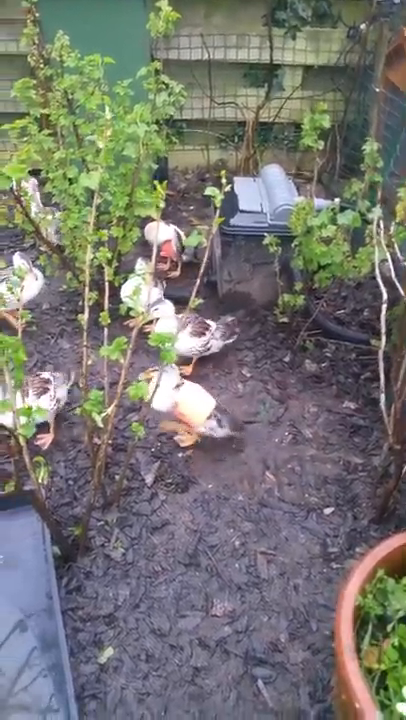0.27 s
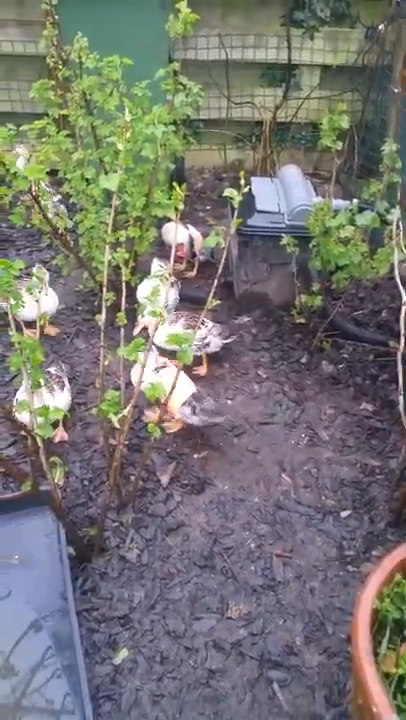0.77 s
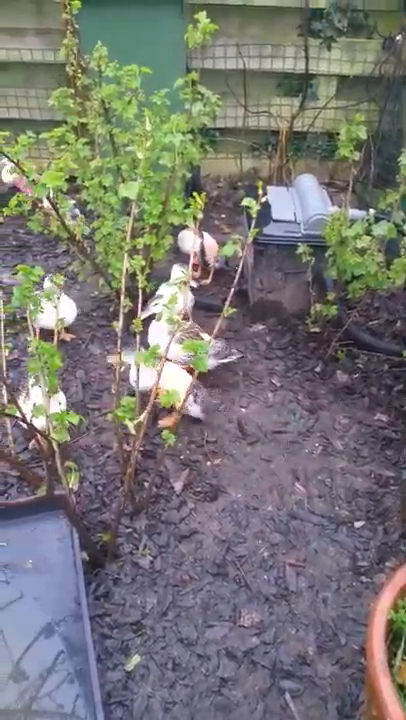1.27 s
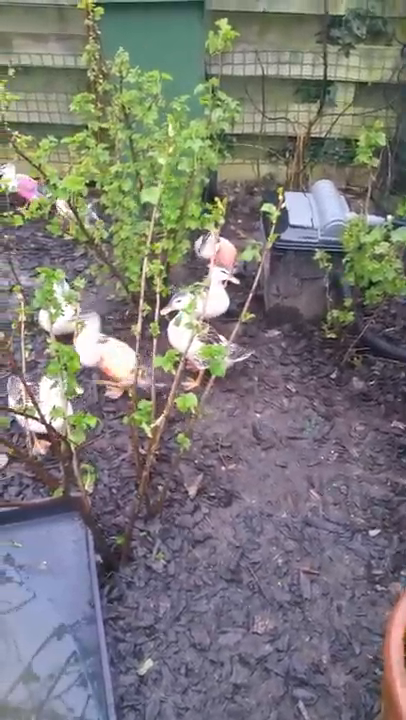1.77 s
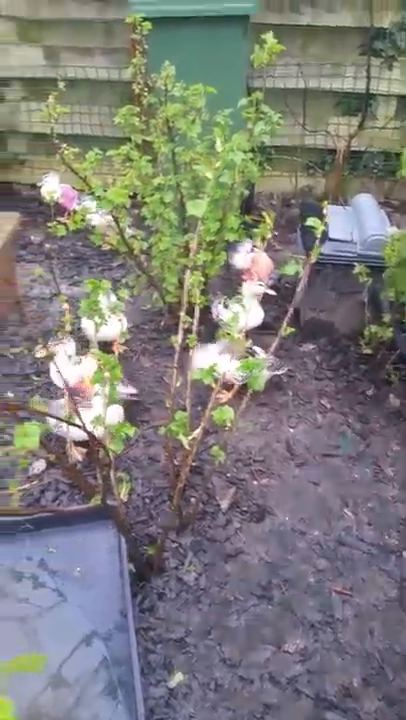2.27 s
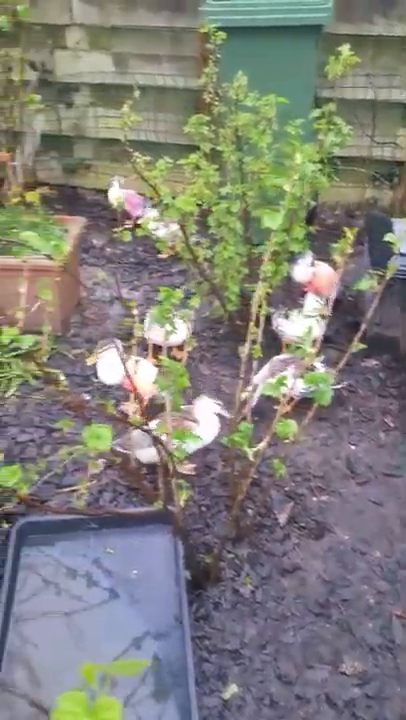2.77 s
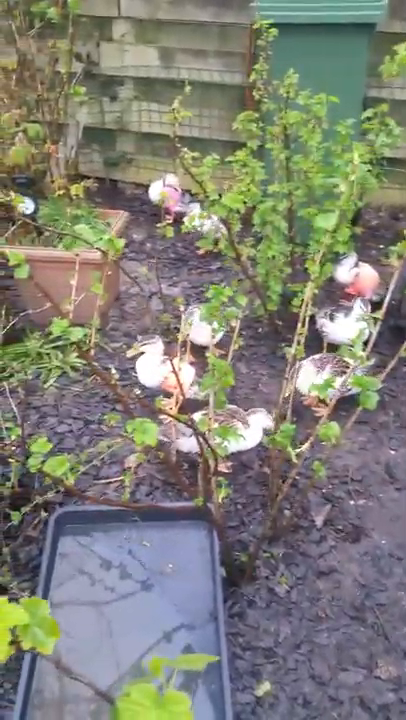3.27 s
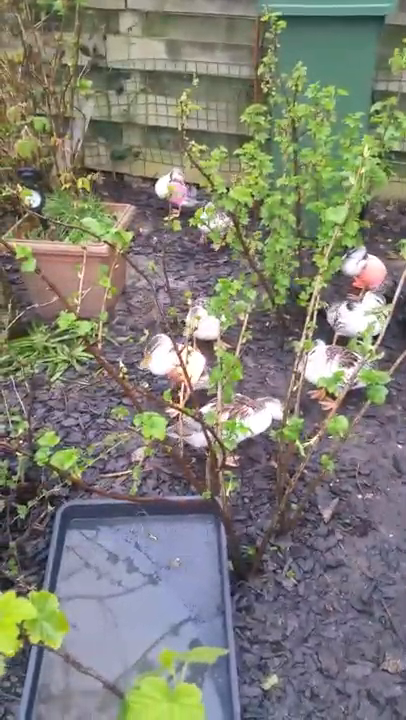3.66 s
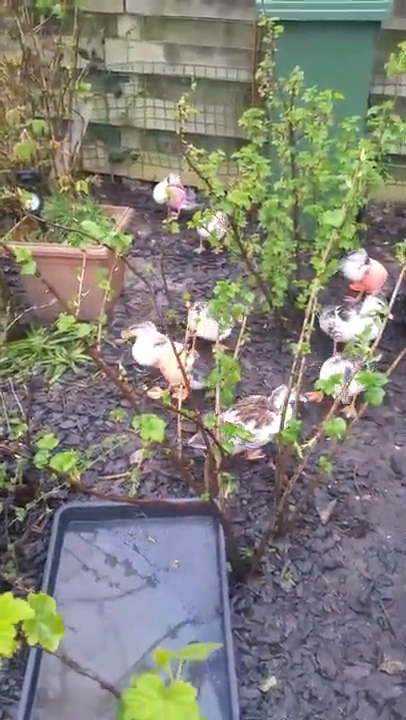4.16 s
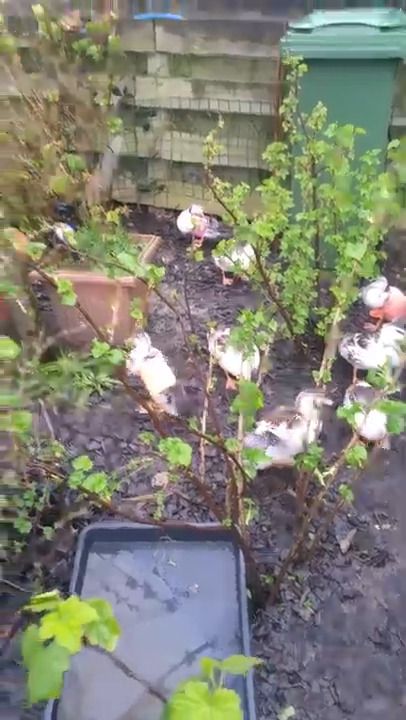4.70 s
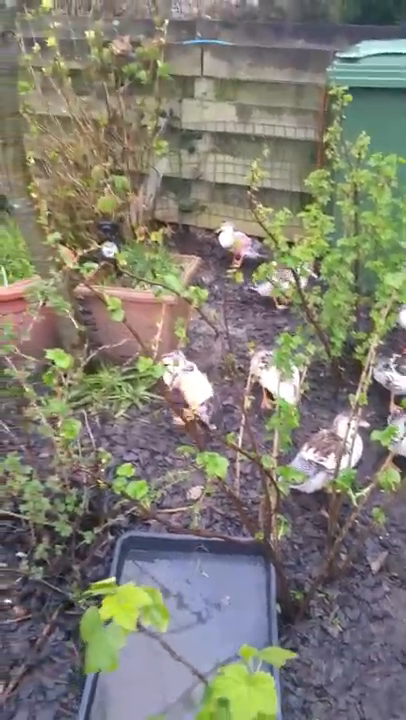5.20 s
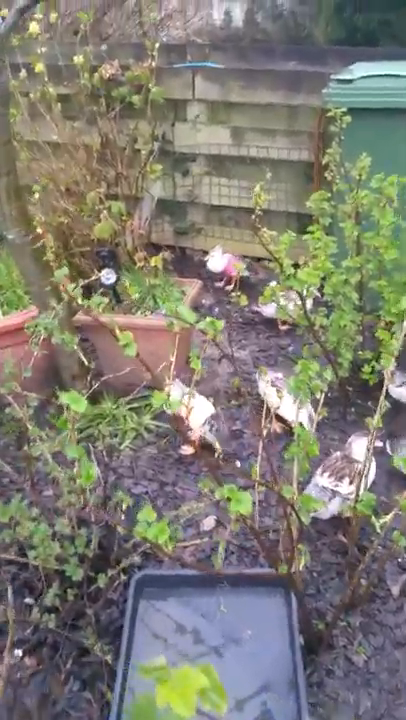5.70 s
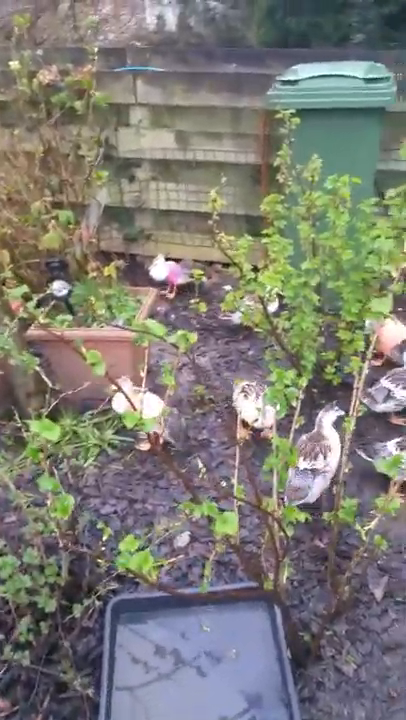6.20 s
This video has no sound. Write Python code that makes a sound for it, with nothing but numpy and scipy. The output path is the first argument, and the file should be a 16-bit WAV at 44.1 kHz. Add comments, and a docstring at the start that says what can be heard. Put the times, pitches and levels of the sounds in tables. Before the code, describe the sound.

Young ducks call over one another in a small garden: harsh squawks, hoarse regular quacks and whistled peeps, with wind buffeting the microphone over distant rumble.

```python
"""Young ducks in a garden

Young ducks call over one another in a small fenced garden: whistled peeps, harsh squawks, hoarse quacks and short squeaks.
Each call mixes the two sides of a syrinx (a bird's voice box), which sing at different pitches; a squeak uses one side.
Twigs and litter snap and knock as bursts of noise that ring broad resonances, and echoes follow the near sounds.
Filtered noise makes the wind that buffets the microphone and the distant outdoor rumble under it all.
"""
import sys
import numpy as np
from scipy import signal
from scipy.fft import rfft, irfft
from scipy.io import wavfile
from scipy.ndimage import uniform_filter1d

SR = 44100
rng = np.random.default_rng(int(sys.argv[2]) if len(sys.argv) > 2 else 0)


def pcm_store(signal):
    """Save signal as 16-bit PCM."""
    levels = np.round(np.clip(np.atleast_2d(signal), -1, 1) * 32767)
    wavfile.write(sys.argv[1], SR, levels.astype(np.int16).T)


N = 284356  # length in samples
TIME = np.arange(N) / SR  # seconds
FREQS = np.maximum(np.arange(N // 2 + 1) * SR / N, 1)  # Hz; at least 1 so that its log exists


def from_db(db):
    """Decibels to gain."""
    return 10 ** (np.asarray(db) / 20)


def rms_one(x):
    """Scale to unit power."""
    return x / np.sqrt(np.mean(x ** 2) + 1e-20)


def across_hz(points):
    """A (Hz, value) table read at every frequency, along a log pitch scale."""
    hz, value = np.transpose(points)
    return np.interp(np.log(FREQS), np.log(hz), value)


def colour(x, points):
    """Filter by a (Hz, dB) table."""
    return irfft(rfft(x) * from_db(across_hz(points)), N)


def wander(rate_hz, size):
    """Smooth random drift of unit power that changes about rate_hz times a second."""
    hz = np.arange(size // 2 + 1) * SR / size
    slowed = rfft(rng.standard_normal(size)) / (1 + (hz / rate_hz) ** 2)
    return rms_one(irfft(slowed, size))


def panned(x, pan_db):
    """Two channels, pan_db apart (left minus right), whose mean keeps the level of x."""
    left, right = from_db(pan_db / 2), from_db(-pan_db / 2)
    return np.array([x * left, x * right]) * 2 / (left + right)


def add(out, start_s, sound):
    """Mix a sound in from a start time, cut to fit the scene."""
    start = int(round(start_s * SR))
    first, last = max(start, 0), min(start + sound.shape[1], N)
    out[:, first:last] += sound[:, first - start:last - start]


def from_side(pair, lag_ms, most_turn):
    """Sound from one side reaches the left port later (or, if negative, sooner)."""
    # the turn of phase, in radians, levels off at most_turn in the treble
    turn = most_turn * np.tanh(2 * np.pi * FREQS * lag_ms / 10 ** 3 / most_turn)
    left = irfft(rfft(pair[0]) * np.exp(-1j * turn), N)
    return np.array([left, pair[1]])


# Tone of the distant rumble: pitch_hz [Hz], level_db [dB]
OUTDOORS_TONE = [(12, -46), (20, -12), (91, 2), (120, -7), (216, -10), (459, -7.5), (698, -7.5), (825, -8),
                 (1370, -10), (1810, -14.5), (2750, -18.5), (3070, -20.5), (5230, -29), (10800, -34.5),
                 (16000, -38.5)]
# How alike the two microphone ports hear it: pitch_hz [Hz], likeness [clipped to 0-1 when played]
OUTDOORS_LIKENESS = [(50, 3.3), (300, 1.4), (1000, 0.34), (3000, -0.44), (10000, -0.43)]
# How far it leans to the left: pitch_hz [Hz], pan_db [dB, left minus right]
OUTDOORS_LEAN = [(50, 3.7), (600, 2.9), (2000, 4.1), (8000, 0.32)]


def outdoors(level_db):
    """Far traffic and leaves: steady noise, alike in both ears in the bass."""
    mid, side = rfft(rng.standard_normal((2, N)))
    alike = np.clip(across_hz(OUTDOORS_LIKENESS), 0, 1)
    # what is added to one ear and taken from the other makes them differ
    difference = np.sqrt((1 - alike) / (1 + alike)) * side
    pair = mid + difference * np.array([[1], [-1]])
    tone = panned(from_db(across_hz(OUTDOORS_TONE)), across_hz(OUTDOORS_LEAN))
    noise = irfft(pair * tone, N)
    return from_db(level_db) * noise / noise.mean(axis=0).std()


# Rise and fall of the breeze, read against its own median: time_s [s], strength_db [dB]
BREEZE = [(0.0, -43.5), (0.2, -42), (0.48, -50), (1.92, -57.5), (2.31, -52.5), (2.55, -46.5), (2.76, -46.5),
          (2.96, -41), (3.51, -44), (3.69, -46.5), (3.8, -42.5), (4.73, -47), (4.9, -51.5), (5.38, -50),
          (5.69, -63), (6.44, -59)]
# Tone of wind noise: pitch_hz [Hz], level_db [dB]
WIND_TONE = [(12, -32), (20, -9), (65, 2), (114, 3.5), (206, -6), (500, -28), (650, -38), (1100, -120)]


def wind(middling_db, swing, pan_db, lump_db, lump_hz):
    """Lumpy turbulence, separate at each port, that follows the breeze."""
    time_s, strength_db = np.transpose(BREEZE)
    breeze_db = np.interp(TIME, time_s, strength_db) - np.median(strength_db)
    # swing: dB of turbulence per dB of breeze
    force = panned(from_db(middling_db + swing * breeze_db), pan_db)
    lumps = rms_one(from_db(lump_db * np.array([wander(lump_hz, N), wander(lump_hz, N)])))
    noise = rms_one(colour(rng.standard_normal((2, N)), WIND_TONE))
    return force * lumps * noise


# The strongest buffets: peak_s [s], level_db [dB, before the common level_db is added]
BUFFETS = [(.005, -29.5), (.19, -37), (1.612, -36), (2.421, -31), (2.772, -21), (2.827, -18),
           (2.941, -24.5), (3.056, -26), (3.154, -22), (3.349, -19.5), (3.796, -23), (3.84, -31.5),
           (3.876, -20.5), (3.976, -27), (4.138, -24), (4.19, -25), (4.247, -27.5), (4.359, -27),
           (4.566, -29.5), (4.632, -18.5), (4.83, -28.5), (5.291, -30.5), (5.458, -34.5)]


def buffets(level_db, width_s, eddy_db, right_port_db):
    """Short puffs of turbulence catch the left port; stronger ones shed more of the smaller, higher eddies."""
    power = 0
    for peak_s, puff_db in BUFFETS:
        distance = np.minimum(((TIME - peak_s) / width_s) ** 2, np.log(10 ** 12))
        power = power + from_db(2 * puff_db) * np.exp(-distance)
    push = np.sqrt(power)
    rumble = rms_one(colour(rng.standard_normal((2, N)), WIND_TONE))
    # even out the slow chance swells, so each puff spends its whole force
    rumble /= np.sqrt(uniform_filter1d(rumble ** 2, SR // 40) + 0.041)
    eddy_tone = [(60, -16), (200, 7.0), (400, -7), (800, -16.5), (2000, -42), (8000, -80)]  # (Hz, dB)
    eddies = rms_one(colour(rng.standard_normal((2, N)), eddy_tone))
    puffs = push * (rumble + from_db(eddy_db) * eddies * push / push.max())
    return from_db(level_db) * puffs * from_db([[0], [right_port_db]])


# Echoes off ground, pots and fence: delay_s [s], level_db [dB], pan_db [dB, left minus right]
ECHOES = [(.0034, -67, 10), (.0071, -14.5, 3), (.013, -17.5, 15), (.021, -24, -15)]


def garden(x, tail_db, t60, dull_hz):
    """A few echoes and a short scatter from fence and shrubs follow the direct sound."""
    out = x.copy()
    # the right channel, with its treble softened, feeds every reflection
    dull = signal.sosfilt(signal.butter(1, dull_hz, fs=SR, output="sos"), x[1])
    for delay_s, level_db, pan_db in ECHOES:
        add(out, delay_s, panned(from_db(level_db) * dull, pan_db))
    t = TIME[:SR // 2]
    build_up = np.minimum(t / 0.018, 1)
    scatter = rng.standard_normal((2, len(t))) * from_db(-60 * t / t60) * build_up
    scatter /= np.sqrt(np.sum(scatter ** 2) / 2)
    tail = signal.fftconvolve(dull[None], scatter, axes=1)[:, :N]
    return out + from_db(tail_db) * tail


# Crisp snaps of twigs and litter: start_s [s], level_db [dB, of the burst as it starts],
# pan_db [dB, left minus right], t60_s [s for the burst to fall 60 dB]
SNAPS = [(.197, -45.5, 0, 0.022), (.533, -44, 5, .039), (.666, -48, -1, 0.024), (1.1524, -17, 0, 0.017),
         (1.641, -48.5, -1, 0.022), (2.047, -46.5, 9, .015), (3.388, -49, 3, .03), (4.029, -42, 0, 0.0073),
         (4.839, -47, 3, .011), (5.78, -46, -6, 0.016), (5.801, -45, -1, .027)]
# Dull knocks: start_s [s], level_db [dB], pan_db [dB], t60_s [s], as for the snaps
KNOCKS = [(1.3368, -20.5, 3.5, 0.015), (5.7485, -28.5, 0.5, 0.021), (5.7805, -37.5, 4, 0.15),
          (6.157, -39.5, 3, 0.12)]
# What the snaps ring with: pitch_hz [Hz], width_hz [Hz], level_db [dB]
SNAP_BODY = [(990, 3300, -3), (2410, 150, 9), (3500, 790, -0.5), (6100, 4200, -3), (7770, 700, 4),
             (11500, 1700, -1.5)]
# What the knocks ring with: pitch_hz [Hz], width_hz [Hz], level_db [dB]
KNOCK_BODY = [(715, 1090, 13.5), (1400, 1650, 9), (2960, 680, -1), (4650, 2900, -10), (8200, 5500, -14)]


def hits(table, body, tail_db, tail_t60):
    """A burst of tiny fractures, with a settling tail, rings the broad resonances of the struck thing."""
    out, t = np.zeros((2, N)), TIME[:SR // 5]
    for start_s, level_db, pan_db, t60_s in table:
        grit = rng.standard_normal(len(t))
        burst = grit * (from_db(-60 * t / t60_s) + from_db(tail_db - 60 * t / tail_t60))
        rung, power = 0, 0
        for k, (pitch_hz, width_hz, mode_db) in enumerate(body):
            r = np.exp(-np.pi * width_hz / SR)  # a wider resonance dies sooner
            poles = [1, -2 * r * np.cos(2 * np.pi * pitch_hz / SR), r * r]
            mode = (1 - r * r) / 2 * signal.lfilter([1, 0, -1], poles, burst)
            rung = rung + (-1) ** k * from_db(mode_db) * mode  # neighbours alternate in sign
            power += from_db(2 * mode_db) * (1 - r * r) / 2
        add(out, start_s, panned(from_db(level_db) * rung / np.sqrt(power), pan_db))
    return out


def litter():
    """Twigs and litter snap crisply or knock dully."""
    snaps = hits(SNAPS, SNAP_BODY, tail_db=-25, tail_t60=0.14)
    knocks = hits(KNOCKS, KNOCK_BODY, tail_db=1, tail_t60=0.015)
    return snaps + knocks


def membrane(hz, rough, jitter, jitter_hz, flutter_db):
    """One side of the syrinx: a sine whose cycles come early or late, strong or weak, as it gets rough."""
    size = len(hz)
    drift = 1 + jitter * rough ** 2 * wander(jitter_hz, size)
    phase = 2 * np.pi * np.cumsum(hz * drift) / SR
    stumble = .6 * rough * wander(2 * jitter_hz, size)  # radians
    flutter = rms_one(from_db(flutter_db * rough * wander(jitter_hz, size)))
    return np.sin(phase + stumble) * flutter


# Short squeaks on one sliding note: start_s [s], length_s [s], first_hz [Hz], last_hz [Hz],
# level_db [dB, before the swell and fade], roughness [0-1], pan_db [dB, left minus right]
SQUEAKS = [(.098, 0.073, 2040, 1890, -54, 0.3, 13), (0.314, .048, 1570, 1626, -39, 0.25, -2),
           (.352, 0.068, 1867, 2040, -44, 0.39, 5), (0.561, .14, 3440, 2830, -60.5, 0.46, 0),
           (1.2, 0.033, 2180, 2097, -29.5, 0.17, 4), (1.869, 0.035, 2780, 2020, -43.5, .38, 1),
           (2.529, 0.015, 2605, 2010, -40.5, 0.25, -3), (4.679, 0.012, 4420, 3990, -37.5, 0.73, -58),
           (4.688, .0185, 2610, 1700, -28.5, 0.62, 8), (6.145, 0.028, 3670, 2670, -45, 0.63, -1)]


def squeaks(jitter, jitter_hz, overtone_db, air_db):
    """One side of the syrinx alone slides through a brief note; a rough one spits air at each opening."""
    out = np.zeros((2, N))
    for start_s, length_s, first_hz, last_hz, level_db, rough, pan_db in SQUEAKS:
        size = int(length_s * SR)
        slide = np.geomspace(first_hz, last_hz, size)
        swing = rms_one(membrane(slide, rough, jitter, jitter_hz, flutter_db=3.5))
        hiss = uniform_filter1d(rng.standard_normal(size), size=3)
        air = from_db(air_db) * np.maximum(swing, 0) * hiss
        overtone = from_db(overtone_db) * (swing ** 2 - 1)
        voice = swing + rough * (overtone + air)
        swell = np.sin(np.linspace(0, np.pi, size))
        add(out, start_s, panned(from_db(level_db) * voice * swell, pan_db))
    return out


def ease(x):
    """A smooth step from 0 to 1 as x goes from 0 to 1."""
    return np.sin(np.pi / 2 * np.clip(x, 0, 1)) ** 2


def gesture(scoop, scoop_s, rise_per_s, sag, sag_s, attack_s, release_s,
            break_at, break_s, mend_s, early_high_db, high_db, early_rough):
    """How a duck shapes every call: pitch slides in, climbs and sags, and the voice breaks, then mends."""
    def shape(size):
        """Pitch bend, strength of the low and high sides, and share of roughness through one call."""
        t = np.arange(size) / SR
        left = t[-1] - t  # seconds until the end
        slide_in = 1 + scoop * np.maximum(1 - t / scoop_s, 0) ** 2  # from above if scoop > 0, else below
        climb = 1 + rise_per_s * (t - t.mean())
        droop = 1 - sag * np.maximum(1 - left / sag_s, 0) ** 2
        bend = slide_in * climb * droop
        # the break is centred at the share break_at of the call and mends in the last mend_s
        broken = ease((t - break_at * t[-1]) / break_s + .5) * ease(left / mend_s)
        low = np.minimum(t / attack_s, 1) * np.minimum(left / release_s, 1) + 10 ** -4
        high = low * from_db(early_high_db + (high_db - early_high_db) * broken)
        hoarse = early_rough + (1 - early_rough) * broken
        return bend, low, high, hoarse
    return shape


def calls(table, shape, throat, jitter, jitter_hz, flutter_db, air_db, opening, stiffness, usual_drive, push):
    """Both sides work one air stream, so overtones and sum and difference tones arise, with hissing air."""
    out = np.zeros((1, N))
    usual_db = np.mean([row[4] for row in table])
    for start_s, length_s, low_hz, high_hz, level_db, rough in table:
        size = int(length_s * SR)
        bend, low, high, hoarse = shape(size)
        # loud calls and their broken parts are pressed harder
        drive = usual_drive * hoarse * from_db(push * (level_db - usual_db))
        low_side = low * membrane(low_hz * bend, rough * hoarse, jitter, jitter_hz, flutter_db)
        high_side = high * membrane(high_hz * bend, rough * hoarse, jitter, jitter_hz, flutter_db)
        swing = low_side + high_side
        effort = np.hypot(low, high)
        pressure = np.sqrt(effort / effort.max())  # overtones and hiss swell with the call
        # stretched membranes resist a wide swing
        gap = np.tanh(stiffness * drive * pressure * swing / effort)
        # the flow is pinched off as they close
        flow = (np.logaddexp(0, opening * drive * gap) - np.log(2)) / drive
        flow = rms_one(signal.sosfilt(signal.butter(2, 500, "high", fs=SR, output="sos"), flow))
        # air hisses at each opening
        hiss = rms_one(pressure * np.maximum(gap, 0) * rng.standard_normal(size))
        air = from_db(air_db) * rough * hoarse * hiss
        add(out, start_s, from_db(level_db) * rms_one(pressure * (flow + air))[None])
    return colour(out[0], throat)


# Whistled peeps: start_s [s], length_s [s], low_side_hz [Hz] and high_side_hz [Hz, before the bend],
# level_db [dB, before the throat], roughness [0-1]
PEEPS = [(1.163, 0.079, 1936, 2060, -45.5, 0.25), (1.903, 0.12, 1760, 1975, -46, 0.23),
         (2.848, 0.11, 1780, 1978, -45, .3), (3.19, 0.11, 1873, 2145, -41, 0.36),
         (3.617, .115, 1814, 2070, -41, 0.4), (3.903, 0.096, 1887, 2182, -36.5, 0.32)]
# Throat and open bill of the peeping duck: pitch_hz [Hz], level_db [dB]
PEEP_THROAT = [(300, -6), (800, -9), (1500, -0.5), (2300, 5), (2900, 3), (4000, 2), (5400, 12), (5850, 15),
               (6300, -2.5), (8000, 0), (9500, 0), (11500, -5), (16000, -27)]


def peeping_duck():
    """Clear whistles that dip in from above, arch upward and split into two notes."""
    shape = gesture(scoop=.45, scoop_s=.026, rise_per_s=1.4, sag=.2, sag_s=.028,
                    attack_s=0.017, release_s=.013, break_at=0.43, break_s=0.013, mend_s=0.023,
                    early_high_db=-20.5, high_db=-1.5, early_rough=1.0)
    voice = calls(PEEPS, shape, PEEP_THROAT, jitter=0.12, jitter_hz=297, flutter_db=3, air_db=-9.0,
                  opening=9.5, stiffness=1.29, usual_drive=0.4, push=0.68)
    return from_side(panned(voice, pan_db=3), lag_ms=-0.13, most_turn=1.0)


# Hoarse quacks, about three a second: start_s [s], length_s [s], low_side_hz [Hz, before the bend],
# level_db [dB, before the throat], roughness [0-1]
QUACKS = [(1.195, .1, 1985, -47, .88), (1.461, .11, 2130, -42.5, .95), (1.769, .11, 2170, -40, .84),
          (2.087, .11, 2170, -40.5, .78), (2.407, .11, 2220, -39, .76), (2.756, .1, 2130, -39.5, .87),
          (3.093, .1, 2260, -38, .7), (3.436, .1, 2320, -38, .74), (3.778, .115, 2100, -38, .64),
          (4.243, .095, 2130, -40.5, .72), (4.569, .1, 2240, -41, .75), (4.903, .095, 1990, -41.5, .62),
          (5.256, .108, 1950, -40.5, .6), (5.612, .097, 1980, -43, .76), (5.942, .095, 1960, -40.5, .68)]
# Throat and open bill of the quacking duck: pitch_hz [Hz], level_db [dB]
QUACK_THROAT = [(300, -12), (900, -4), (1700, -0.5), (2500, -3), (3300, -1), (4400, 0.5), (5500, 2.5),
                (6400, -10), (8200, 4), (9500, 1), (11000, 0), (15000, -24.5)]


def quacking_duck():
    """Both sides slide up from below, fairly clean at first, then break up into a rasp."""
    shape = gesture(scoop=-.35, scoop_s=.052, rise_per_s=.9, sag=.06, sag_s=0.026,
                    attack_s=0.028, release_s=0.025, break_at=.32, break_s=.06, mend_s=0.0068,
                    early_high_db=2, high_db=-2.5, early_rough=.45)
    high_hz = 2714  # the same in every quack, before the bend
    table = [(start_s, length_s, low_hz, high_hz, level_db, rough)
             for start_s, length_s, low_hz, level_db, rough in QUACKS]
    voice = calls(table, shape, QUACK_THROAT, jitter=0.131, jitter_hz=380, flutter_db=6.0, air_db=-8.5,
                  opening=0.96, stiffness=1.0, usual_drive=1.0, push=0.26)
    return from_side(panned(voice, pan_db=0.5), lag_ms=0.066, most_turn=2.05)


# Squawks of a duck whose voice is already deeper: start_s [s], length_s [s], low_side_hz [Hz] and
# high_side_hz [Hz, before the bend], level_db [dB, before the throat], roughness [0-1]
SQUAWKS = [(0, 0.11, 1583, 2186, -33.5, 0.26), (.414, 0.1, 1611, 2204, -30, 0.19),
           (.822, .108, 1622, 2154, -30.5, 0.48)]
# Throat and open bill of the squawking duck: pitch_hz [Hz], level_db [dB]
SQUAWK_THROAT = [(300, 5), (800, -3), (1100, -5), (1500, -4.5), (2300, 6), (3000, -1.5), (4000, 4),
                 (5200, 1), (6200, -2), (6800, 0), (8400, -7), (9400, 3.5), (11000, -8.5)]


def squawking_duck():
    """Loud, harsh calls that arch and drop steeply at the end."""
    shape = gesture(scoop=.3, scoop_s=.017, rise_per_s=1.6, sag=.46, sag_s=.034,
                    attack_s=0.013, release_s=.012, break_at=0.39, break_s=.05, mend_s=.028,
                    early_high_db=-11.5, high_db=-9.5, early_rough=0.85)
    voice = calls(SQUAWKS, shape, SQUAWK_THROAT, jitter=.05, jitter_hz=410, flutter_db=13, air_db=-5,
                  opening=2.4, stiffness=2.2, usual_drive=0.78, push=0.57)
    return from_side(panned(voice, pan_db=-0.5), lag_ms=0.084, most_turn=2.15)


def scene():
    """Ducks and small noises in the garden, over wind and distant rumble."""
    rumble = outdoors(level_db=-51)
    breeze = wind(middling_db=-45, swing=1.49, pan_db=7, lump_db=6, lump_hz=16)
    puffs = buffets(level_db=-2, width_s=0.015, eddy_db=-14.5, right_port_db=-22.5)
    squeaking = squeaks(jitter=0.197, jitter_hz=450, overtone_db=-9.5, air_db=0.0)
    small_noises = from_side(squeaking + litter(), lag_ms=0.083, most_turn=1.84)
    ducks = peeping_duck() + quacking_duck() + squawking_duck()
    near = garden(ducks + small_noises, tail_db=-11.0, t60=0.2, dull_hz=7200)
    return near + breeze + puffs + rumble


def record(dry):
    """The treble above 15900 Hz is cut steeply, without delay."""
    steep = signal.ellip(8, .05, 60, 15900, fs=SR, output="sos")
    return signal.sosfiltfilt(steep, dry)


dry = scene()
out = record(dry)
pcm_store(out)
```